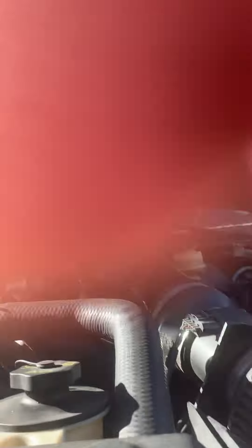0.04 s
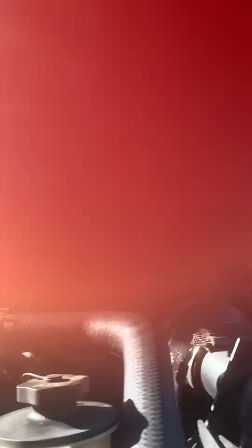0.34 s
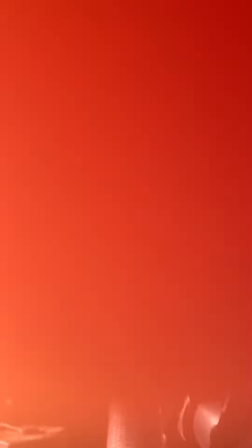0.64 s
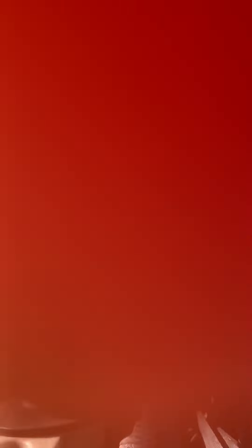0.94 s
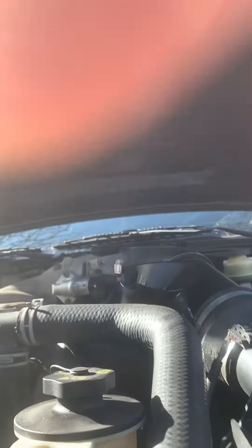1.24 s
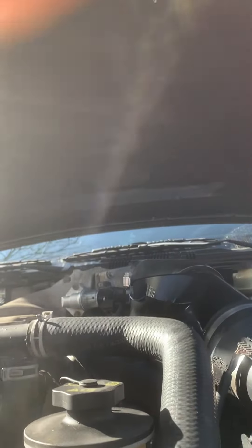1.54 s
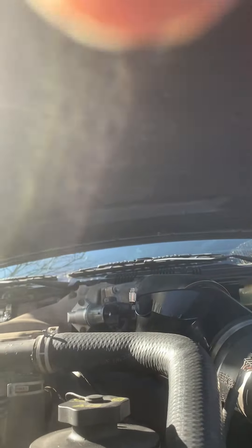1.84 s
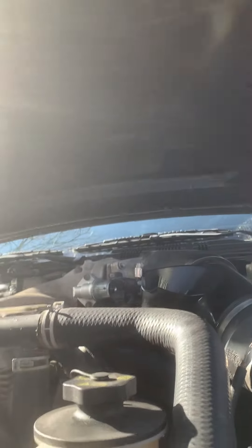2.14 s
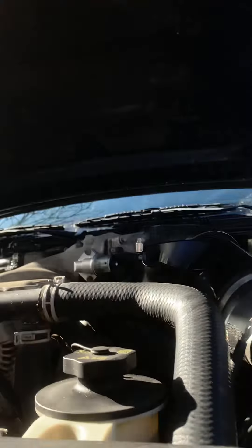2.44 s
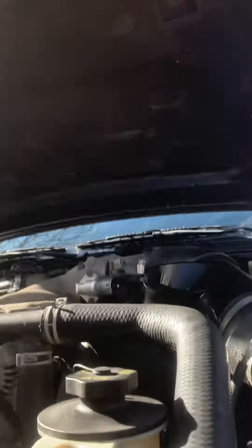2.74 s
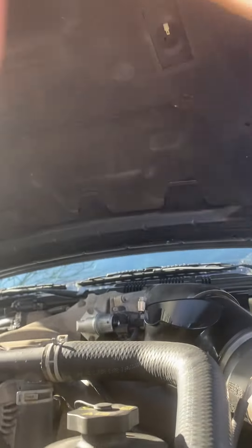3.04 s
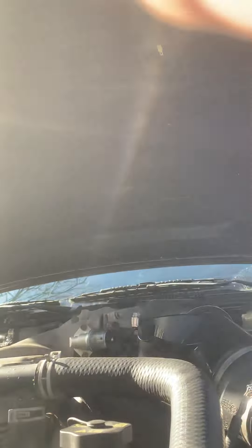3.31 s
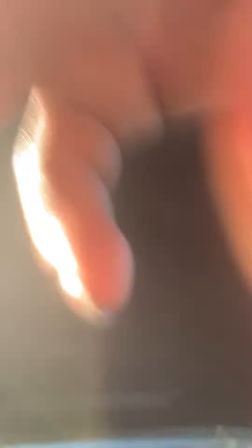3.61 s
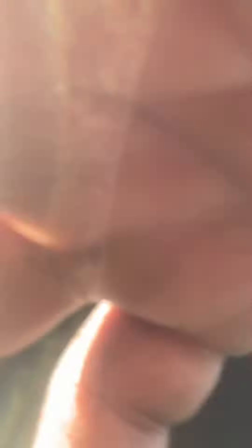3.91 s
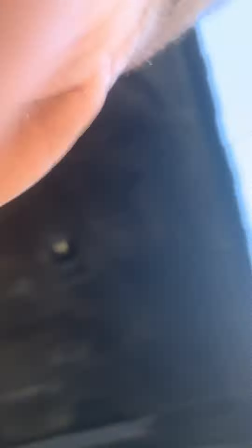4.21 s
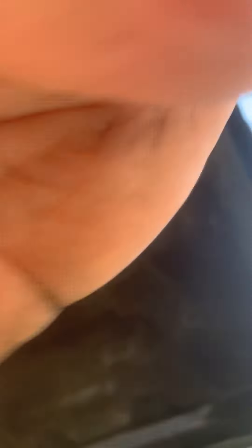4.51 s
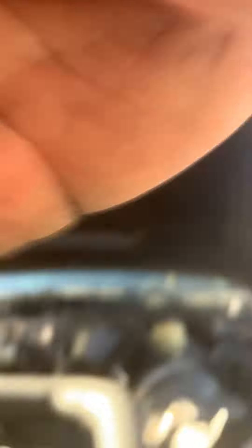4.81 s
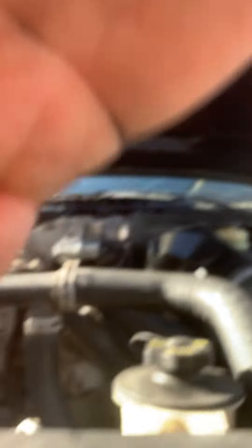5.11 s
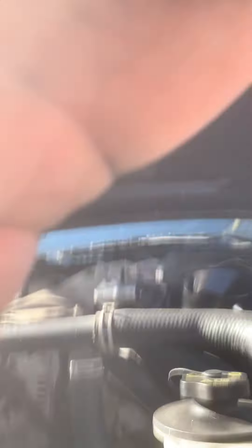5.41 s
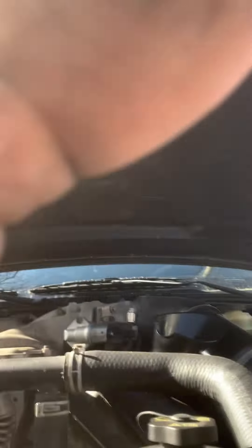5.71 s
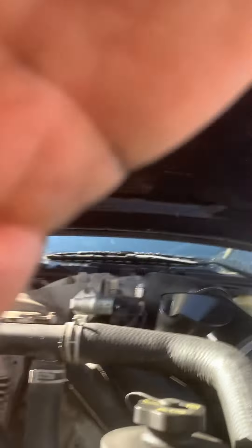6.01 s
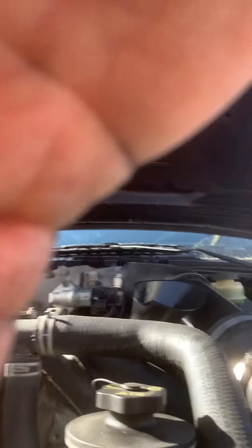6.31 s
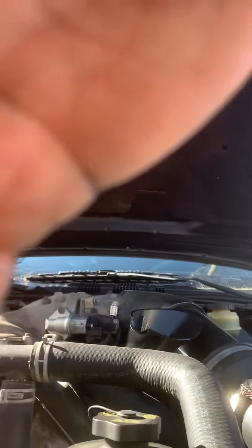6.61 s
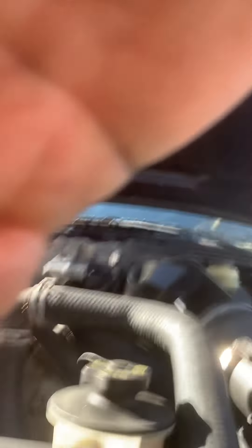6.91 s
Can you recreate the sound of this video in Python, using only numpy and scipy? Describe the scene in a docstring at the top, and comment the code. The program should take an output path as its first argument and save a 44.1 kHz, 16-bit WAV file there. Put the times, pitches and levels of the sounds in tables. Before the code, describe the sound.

A hand shifts its grip on a phone, so everything sounds very close and travels through the case: short raspy skin rubs, fingertip knocks that fall from a tick to a thud, and a low, bumpy rumble. It opens with a thump and a scrape, a hard knock at about 0.6 seconds and strong rubbing until 0.9. From roughly 1.2 to 3 seconds there are only lighter brushes and soft bumps. Rubbing builds again, and at 3.5 seconds a loud, slightly hollow cluster of knocks brings a sharp fingernail click and a plastic snap. A second flurry runs from 4.1 to 4.3 seconds, ending in a sharper snap. Softer scrapes and separate taps follow, some hollow, with a firmer knock near 5.5, others around 6.1 and 6.6, and a last few at 6.9. Very faint outdoor air lies underneath throughout.

```python
"""Skin rubs and fingertips knock on a phone as a hand shifts its grip over a car's silent engine bay.
The rubbing is stick-slip friction, dense tiny slips; each knock is an impulse that the case filters.
A nail sometimes clicks, the cover snaps twice and the flexing case rumbles, over faint outdoor air.
Low frequencies reach the microphones later than high ones, so each knock falls from a tick to a thud.
Now and then a narrow ring makes the contacts sound hollow; finally the hand closes over one port."""
import sys
import numpy as np
from scipy.fft import rfft, irfft, next_fast_len
from scipy.io import wavfile
from scipy.ndimage import uniform_filter1d, minimum_filter1d, map_coordinates

SR = 44100
rng = np.random.default_rng(int(sys.argv[2]) if len(sys.argv) > 2 else 0)


def generate_wav(sig):
    """Save sig (samples, or channels by samples) to the path in sys.argv[1] as 16-bit PCM at SR."""
    pcm = np.round(np.clip(np.atleast_2d(sig).T, -1, 1) * 32767).astype(np.int16)
    wavfile.write(sys.argv[1], SR, pcm)


N = 306495
BAND_LIMIT_HZ = 16300
# fingertip impacts: (time [s], strength [dB], contact corner [Hz], thump [dB], snap [dB])
FINGERTIP_KNOCKS = [(0.2918, 17.5, 756, 14, -20.5), (0.3249, 20.5, 518, 2.5, -3),
                    (0.5597, 38.5, 608, -10.5, -16), (0.566, 20, 965, 1.5, -8.5),
                    (0.8872, 17.5, 587, -3.5, -15.5), (1.204, 0, 1160, 7.5, -16),
                    (1.241, 6.5, 1110, 5, -20.5), (3.13, 10.5, 1099, -9.5, -5),
                    (3.5185, 33.5, 1464, 11, 3.5), (3.543, 21.5, 1067, 8.5, -9),
                    (3.5533, 28, 456, 8, -19.5), (3.604, 22.5, 1010, -6.5, -10),
                    (3.6347, 30.5, 654, 4.5, 1.5), (3.7584, 15, 638, 19.5, -29),
                    (4.1053, 36, 782, 5.5, -42), (4.1476, 29.5, 770, -3, -30.5),
                    (4.1607, 30, 713, 6.5, -33), (4.1704, 33, 757, 1, -29), (4.1853, 22, 937, 3, -11),
                    (4.2704, 39.5, 441, -5.5, 1.5), (4.3189, 24, 895, 6.5, -36), (4.714, 10, 810, -14, -33),
                    (4.866, 25.5, 732, 1.5, -20.5), (4.993, 30, 644, -1.5, -23.5), (5.164, 21, 932, 5, -11),
                    (5.391, 27, 1010, 6, -28.5), (5.4909, 37.5, 686, -3.5, -23.5),
                    (5.7346, 19.5, 620, 7.5, -37.5), (6.069, 9.5, 700, 0.5, -30),
                    (6.0868, 29.5, 650, -6, -24.5), (6.55, 22.5, 740, 6.5, -29),
                    (6.8898, 26, 1230, -3, -18), (6.904, 30.5, 481, -2.5, -23),
                    (6.929, 16.5, 605, -2.5, -18.5)]


def rubbing(ridge_db=-5.5, flutter_db=3.0, snag_db=1.5, fizz_exponent=0.69, skip_db=4, light_db=-54):
    """Stick-slip friction: sliding skin catches and lets go; finger pad and ridges flutter together."""
    # friction spectra of the pad, the skin ridges and the fizz on top: (frequency [Hz], level [dB])
    pad_spectrum = [(60, -30), (150, -7), (300, -5.5), (430, -4.5), (540, -0.5), (700, 2.5), (850, -6),
                    (1100, -13.5), (1500, -37), (3000, -73.5), (6000, -120)]
    ridge_spectrum = [(500, -32.5), (950, -16.5), (1250, 8), (1700, 11.5), (2300, 1.5), (2700, -14),
                      (3200, -30.5), (4200, -30), (5200, -44), (7000, -61), (16000, -91)]
    fizz_spectrum = [(1500, -58.5), (2800, -9), (3900, 1.5), (4500, -8.5), (5200, -17), (7000, -22.5),
                     (10000, -43.5), (16000, -72.5)]
    # weight of the fizz: (time [s], gain [dB])
    fizz_gains = [(0.4, -38.5), (1, -56.5), (1.32, -38.5), (1.7, -38.5), (3.2, -48), (4.2, -37.5),
                  (5.5, -47.5), (6.9, -44)]
    resting = brushes(level_db=-67.5, rasp_db=-4, spread_db=6, rate=38)
    pad, ridges = np.hypot(strokes(edge_s=0.0027), resting)
    # a barely touching finger skips over the case
    lightness = 1 / (1 + (pad / amp(light_db)) ** 2)
    catch = amp(flutter_db * wobble(62) + skip_db * lightness * (wobble(60) - .5))
    # even the lightest brush fizzes; the fizz grows more slowly than the rasp
    fizz_envelope = abs(ridges) ** fizz_exponent * amp(curve(fizz_gains))
    fizz = fizz_envelope * friction(fizz_spectrum, rate=7600, spread_db=-2, smooth=.8)
    body = pad * friction(pad_spectrum, rate=690, spread_db=4.0, smooth=0.81)
    rasp = ridges * amp(ridge_db) * friction(ridge_spectrum, rate=2100, spread_db=0.5, smooth=0.9)
    snag = amp(snag_db * wobble(45))
    return catch * (body + snag * (rasp + fizz))


def friction(spectrum, rate, spread_db, smooth):
    """Shot noise: random slips, rate a second, over smooth sliding noise; filtered, rms 1."""
    happens = rng.random(N) < rate / SR
    signs = rng.choice([-1, 1], N)
    sizes = amp(spread_db * np.clip(rng.standard_normal(N), -2, 2))
    drive = unit(happens * signs * sizes) + smooth * rng.standard_normal(N)
    return unit(filtered(drive, lambda hz: colour(spectrum, hz)))


def strokes(edge_s, catch_db=14, lift_db=15.5):
    """Friction grows with speed: pad and ridge envelopes as a finger catches, speeds up, slows, lifts."""
    # slides of skin: (start [s], end [s], fastest point [0-1], level [dB], rasp re pad [dB])
    slides = [(0.0, 0.059, 0, -24.5, -14), (0.052, 0.165, 0.4, -46.5, -2), (0.174, 0.264, 0.3, -47, -1),
              (0.248, 0.341, 0.1, -32, -7.5), (0.403, 0.476, 0.8, -64.5, 4), (0.549, 0.59, 0.4, -20, -4),
              (0.65, 0.706, .25, -39, 4.5), (0.68, 0.815, .4, -23.5, -5), (0.768, 0.901, .7, -24.5, 0.5),
              (0.93, 1.097, 0.7, -35, -10.5), (1.1, 1.217, 0.9, -49.5, -20), (1.225, 1.346, 0.6, -40, -5.5),
              (1.347, 1.39, 0.5, -45.5, -15), (1.435, 1.517, 0.7, -47.5, -12.5),
              (1.551, 1.66, 0.1, -43, -6.5), (1.837, 1.874, 0.1, -47, -14.5), (1.913, 2.054, 0, -68, 0.5),
              (2.122, 2.218, .35, -41, -8), (2.25, 2.321, 0.2, -54.5, -4), (2.346, 2.472, .6, -48.5, -11.5),
              (2.695, 2.794, 0.3, -50.5, -4), (3.006, 3.103, 0.6, -41, -4), (3.125, 3.213, 0.1, -30, -5),
              (3.211, 3.42, 0.9, -41.5, -9), (3.412, 3.536, .55, -22.5, -9), (3.548, 3.654, 0.5, -24, -6.5),
              (3.744, 3.822, 0, -46.5, -1), (3.855, 3.916, .1, -35.5, -5.5), (4.031, 4.285, 0.6, -29, -4.5),
              (4.184, 4.209, .5, -37.5, 6.5), (4.289, 4.337, 0.4, -40.5, -8.5),
              (4.369, 4.406, 0.3, -43.5, -9.5), (4.439, 4.551, 0.4, -46.5, 2),
              (4.552, 4.731, .6, -43.5, -2.5), (4.786, 4.841, 0.3, -48, 1), (4.858, 4.896, 0, -36, -3),
              (5.091, 5.275, .45, -44.5, -6.5), (5.359, 5.557, .6, -31, -11.5),
              (5.584, 5.714, 0, -43.5, -5.5), (5.776, 5.878, .5, -37.5, -3),
              (5.869, 5.941, 0.7, -39.5, -1.5), (5.973, 6.044, .5, -64, 2), (6.088, 6.244, 0.2, -33.5, -8),
              (6.296, 6.464, 0.4, -55.5, 5), (6.56, 6.664, 0.3, -55, -3.5),
              (6.711, 6.728, 0.5, -39.5, -8.5), (6.745, 6.847, .3, -47.5, -2.5),
              (6.877, 6.96, 0.2, -33.5, -14)]
    t = np.arange(N) / SR
    pad, ridges = np.zeros((2, N))
    for start, end, fastest, db, rasp_db in slides:
        span = slice(max(0, round(start * SR)), round(end * SR))
        progress = (t[span] - start) / (end - start)
        peak = np.clip(fastest, .05, .95)
        sag_db = np.where(progress < peak, catch_db * (1 - progress / peak) ** 2,
                          lift_db * ((progress - peak) / (1 - peak)) ** 2)
        pad[span] += amp(db - sag_db)
        ridges[span] += amp(db - sag_db + rasp_db)
    return uniform_filter1d(np.array([pad, ridges]), max(2, round(edge_s * SR)), axis=1)


def brushes(level_db, rasp_db, spread_db, rate):
    """Random amplitude modulation: pad and ridge envelopes of resting fingers that graze the case."""
    return amp(level_db + spread_db * np.tanh(wobble(rate))) * np.array([[1], [amp(rasp_db)]])


def knocks(thump_hz=220, order=4.5, scuff=0.38, scuff_t60=0.022):
    """Impact excitation: each blow drives the case, and the softer the contact, the lower its corner."""
    # dull landings of the flesh of the hand: (time [s], strength [dB])
    landings = [(0.004, 9), (0.267, -8), (0.572, 7), (0.906, -7), (1.005, -7), (2.128, -13), (2.414, -11.5),
                (3.018, 7.5), (3.878, 7), (4.1946, 13), (6.5594, -2)]
    # the case's response to a blow and the snap of taut skin: (frequency [Hz], gain [dB])
    case_response = [(10, -30), (25, -31), (50, -4.5), (85, 0.5), (150, -1.5), (300, -1.5), (430, -2),
                     (580, -0.5), (1000, -10), (1700, -6.5), (2700, -21.5), (3600, -26), (5000, -35.5),
                     (9000, -53.5)]
    snap_spectrum = [(300, -28.5), (900, -6.5), (1700, 1), (3000, -9.5), (4500, -7), (6000, -22.5),
                     (9000, -43), (15000, -72.5)]
    flesh = (850, 29.5, -18.5)  # (contact corner [Hz], thump [dB], snap [dB])
    thuds = [(s, db, *flesh) for s, db in landings]
    out, size = np.zeros(N), 8192
    hz, t = np.fft.rfftfreq(size, 1 / SR), np.arange(size) / SR
    for s, db, corner_hz, thump_db, snap_db in FINGERTIP_KNOCKS + thuds:
        lowpass = 1 / np.sqrt(1 + (hz / corner_hz) ** (2 * order))
        contact = lowpass + amp(snap_db) * colour(snap_spectrum, hz)
        thump = amp(thump_db / (1 + (hz / thump_hz) ** 3))
        # the skin skids for a moment after it lands
        skid = rng.standard_normal(size) * amp(-60 * t / scuff_t60)
        push = 1 + scuff * rfft(skid / np.linalg.norm(skid))
        blow = amp(db) * colour(case_response, hz) * contact * thump * push
        add(out, np.fft.fftshift(irfft(blow)), s)
    return out


def nails(click_s, gain_db):
    """A brief contact has a wide spectrum: a nail ticks in a bright burst, different at each port."""
    # fingernail contacts: (time [s], level [dB])
    clicks = [(0.576, -51.5), (3.5182, -12), (3.5712, -45.5), (3.636, -37), (4.2, -51.5), (4.273, -23.5),
              (5.1634, -47.5), (5.489, -35.5), (6.8912, -41)]
    # spectrum of a click: (frequency [Hz], gain [dB])
    click_spectrum = [(1500, -30), (3000, -2), (5000, -3), (7800, 0), (9000, -5), (10500, 0), (13000, -13),
                      (15500, -7)]
    out, t = np.zeros((2, N)), np.arange(-SR // 100, SR // 100) / SR
    for s, db in clicks:
        add(out, amp(db + gain_db) * np.exp(-abs(t) / click_s) * rng.standard_normal((2, len(t))), s)
    return filtered(out, lambda hz: colour(click_spectrum, hz))


def cover_snaps(pitch_hz=2700, t60=0.0078, glide=0.072):
    """Damped free vibration: the plastic cover snaps and rings, its pitch sagging as it relaxes."""
    # snaps under two hard knocks: (time [s], level [dB])
    snaps = [(3.631, -17.5), (4.2678, -10)]
    out, t = np.zeros(N), np.maximum(np.arange(-SR // 50, SR // 50) / SR, 0)
    phase = 2 * np.pi * pitch_hz * t * (1 + glide * np.exp(-2 * t / t60))
    onset = (1 - np.exp(-t * pitch_hz / 2)) ** 2
    ring = np.sin(phase) * amp(-60 * t / t60) * onset
    for s, db in snaps:
        add(out, amp(db) * ring / abs(ring).max(), s)
    return out


def grip(settle_db=-60, settle_t60=0.2, settle_rise_s=0.008, drag_db=-18):
    """Structure-borne sound: the hand flexes the case in low bumps, more in strokes and after knocks."""
    # rumble from the pressure of the grip: (time [s], level [dB])
    pressure = [(0.0, -28.5), (0.15, -43), (0.47, -55.5), (0.62, -38), (1.15, -45), (1.28, -38.5),
                (1.8, -58.5), (2.95, -54), (3.3, -43), (3.56, -32), (3.74, -49), (4.07, -34.5),
                (4.6, -34.5), (4.78, -63), (5.33, -49.5), (5.55, -41), (6.45, -65.5), (6.95, -45)]
    # spectrum of the flexing case: (frequency [Hz], level [dB])
    rumble_spectrum = [(10, -23.5), (25, -14.5), (50, -3), (80, 0), (120, -5), (200, -12), (350, -21),
                       (1000, -58), (3000, -120)]
    t = np.arange(N) / SR
    settling = np.zeros(N)
    for s, db, *_ in FINGERTIP_KNOCKS:
        after = slice(round(s * SR), round(s * SR) + SR // 2)
        age = t[after] - s
        onset = (1 - np.exp(-age / settle_rise_s)) ** 2
        settling[after] += amp(db + settle_db - 60 * age / settle_t60) * onset
    drag = amp(drag_db) * strokes(edge_s=0.02)[0]
    flex = np.sqrt(amp(curve(pressure)) ** 2 + settling ** 2 + drag ** 2)
    return flex * friction(rumble_spectrum, rate=78, spread_db=7.0, smooth=0.2)


def hollow_ring(x, half_width_hz=45):
    """Zero-phase filtering: at times a narrow band rings before and after each contact, a hollow sound."""
    # ringing spans: (start [s], end [s], pitch [Hz], boost [dB])
    spans = [(3.403, 3.663, 596, 6), (4.828, 5.033, 560, 5), (5.154, 5.176, 637, 10), (5.37, 5.531, 500, 8)]
    hollow = np.zeros(N)
    for start, end, pitch_hz, db in spans:
        band = filtered(x * during(start, end), lambda hz: 1 / (1 + ((hz - pitch_hz) / half_width_hz) ** 2))
        hollow += (amp(db) - 1) * band
    return x + hollow


def phone_resonance(x, pitch_hz=86, width_hz=22, boost_db=3.0):
    """A damped oscillator: the phone, held in the hand, rings briefly at one low pitch."""
    def response(hz):
        damping = 1j * hz * width_hz
        return 1 + (amp(boost_db) - 1) * damping / (pitch_hz ** 2 - hz ** 2 + damping)
    return filtered(x, response)


def ports(x, closes_s=5.1, tilt_db=.4):
    """Phase difference: two microphones hear x out of step; the closing hand shifts phase and balance."""
    # lead of the right port over the left, hand open and closed: (frequency [Hz], phase [rad])
    lead_open = [(650, 0.0032), (850, 0.39), (1100, 0.87), (1400, 0.37), (1700, 0.94), (2200, 0.067),
                 (3800, 0.59)]
    lead_closed = [(100, .03), (300, 0.18), (550, 1.2), (1000, 1.5), (1500, 0.36), (2200, .08), (3800, .2)]
    sides = np.array([[-1], [1]])

    def pair(sound, lead):
        return filtered(sound, lambda hz: np.exp(.5j * sides * np.interp(hz, *np.transpose(lead))))
    closed = during(closes_s, N / SR + 1)
    return pair(x * (1 - closed), lead_open) + pair(x * closed, lead_closed) * amp(tilt_db * sides)


def dispersed(x, cycles, knee_hz):
    """Dispersion: on its way to the microphones each frequency lags by about as many of its own cycles."""
    def response(hz):
        return np.exp(-2j * np.pi * cycles * np.log((hz + knee_hz) / (BAND_LIMIT_HZ + knee_hz)))
    return filtered(x, response)


def air(level_db):
    """Stationary noise: a faint outdoor background, strongest in the bass."""
    # ambient spectrum: (frequency [Hz], level [dB])
    air_spectrum = [(30, 4.5), (200, -9.5), (450, -15.5), (750, -9.5), (1100, -17.5), (2000, -23),
                    (3200, -39), (6000, -35.5), (16000, -51)]
    return amp(level_db) * unit(filtered(rng.standard_normal(N), lambda hz: colour(air_spectrum, hz)))


def amp(db):
    """Decibels to gain."""
    return 10 ** (np.asarray(db) / 20)


def unit(x):
    """Scale to rms 1."""
    return x / np.sqrt(np.mean(x ** 2) + 1e-20)


def colour(points, hz):
    """Gain through (frequency [Hz], level [dB]) points on a log axis."""
    f, db = np.transpose(points)
    return amp(np.interp(np.log(hz + 1), np.log(f), db))


def curve(points):
    """Linear interpolation of (time [s], level [dB]) points at every sample."""
    return np.interp(np.arange(N) / SR, *np.transpose(points))


def wobble(rate):
    """A smooth random curve, rate knots a second."""
    return map_coordinates(rng.standard_normal(int(N * rate / SR) + 4), [np.arange(N) * rate / SR])


def during(start, end, fade_s=.02):
    """A time window: 1 between two moments, 0 elsewhere, with short fades."""
    t = np.arange(N) / SR
    return np.clip(np.minimum(t - start, end - t) / fade_s + .5, 0, 1)


def filtered(x, response):
    """Linear filtering: the spectrum of x times a complex frequency response."""
    size = next_fast_len(N + SR // 2)
    return irfft(rfft(x, size) * response(np.fft.rfftfreq(size, 1 / SR)), size)[..., :N]


def add(track, sound, s):
    """Superposition: mix a sound into the track, its middle at time s."""
    where = round(s * SR) + np.arange(sound.shape[-1]) - sound.shape[-1] // 2
    inside = (where >= 0) & (where < N)
    track[..., where[inside]] += sound[..., inside]


def scene():
    """A common transmission path: the contacts travel through the case to both microphones."""
    skin = hollow_ring(knocks() + rubbing())
    contacts = phone_resonance(skin + cover_snaps() + grip())
    stereo = ports(contacts) + nails(click_s=.0005, gain_db=7.5)
    return dispersed(stereo, cycles=1.7, knee_hz=8.2) + air(level_db=-72.5)


def record(dry):
    """Peak and band limiting: the phone holds the highest peaks down and cuts off the top treble."""
    ceiling, reach = .92, 131  # reach in samples
    needed = np.minimum(1, ceiling / (abs(dry).max(axis=0) + 1e-9))
    held = minimum_filter1d(needed, reach)
    gain = uniform_filter1d(uniform_filter1d(held, reach // 2), reach // 2)
    return filtered(dry * gain, lambda hz: 1 / (1 + (hz / BAND_LIMIT_HZ) ** 90))


dry = scene()
out = record(dry)
generate_wav(out)
```